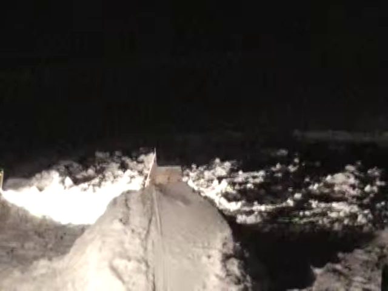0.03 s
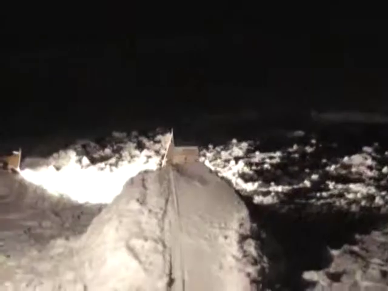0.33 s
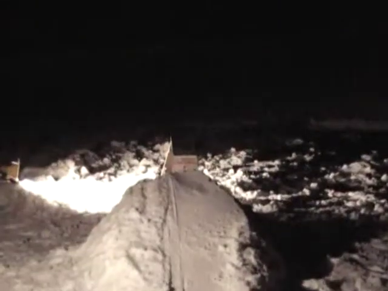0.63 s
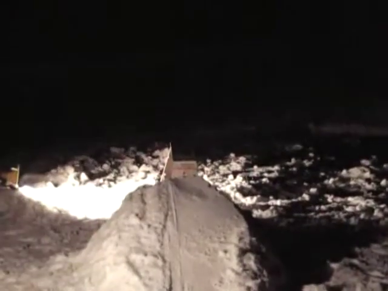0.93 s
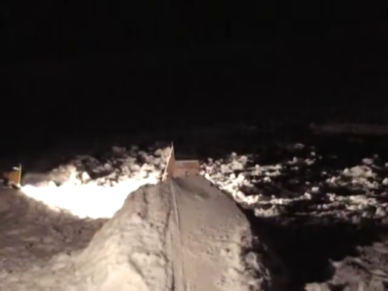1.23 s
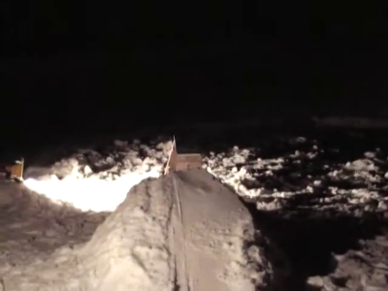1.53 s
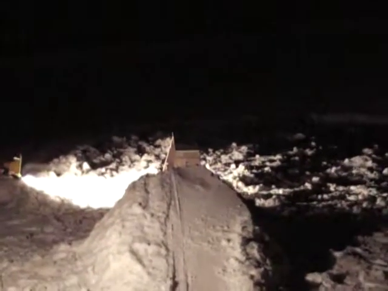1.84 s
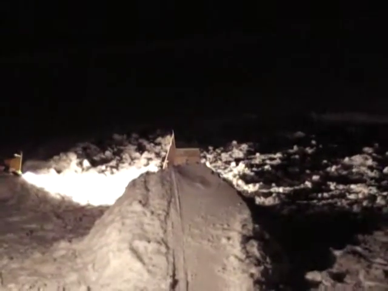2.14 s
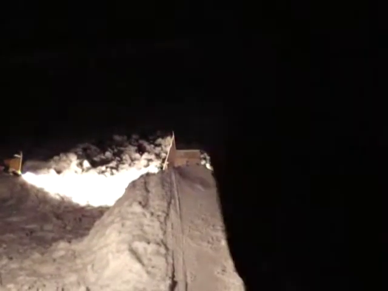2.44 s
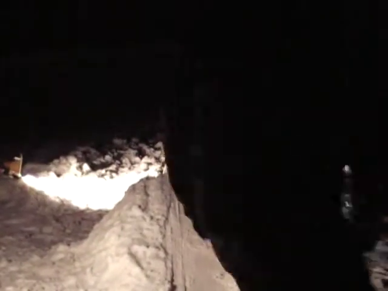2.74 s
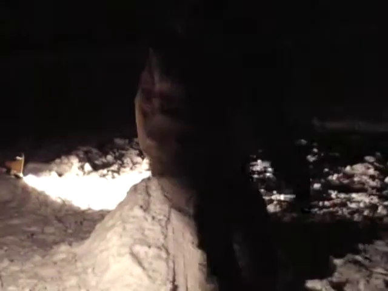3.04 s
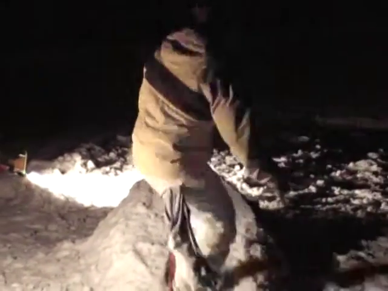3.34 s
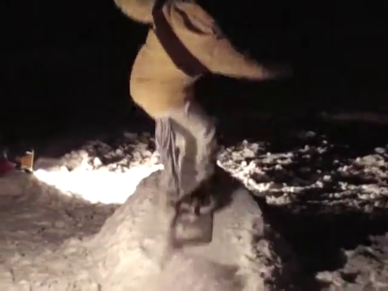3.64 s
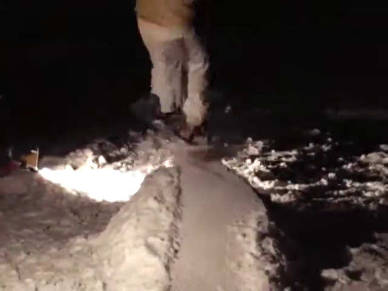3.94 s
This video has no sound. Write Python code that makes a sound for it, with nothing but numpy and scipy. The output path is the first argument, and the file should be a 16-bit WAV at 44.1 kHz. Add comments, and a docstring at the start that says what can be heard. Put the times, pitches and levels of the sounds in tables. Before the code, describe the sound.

A small generator drones steadily outdoors with a fast, clattering beat. A snowboard hisses closer over packed snow, sweeps past the microphone with a spray and a few scrapes, briefly muffling the engine, then fades up a ramp.

```python
"""Outdoors on a snow slope at night, two close microphone ports near a snow ramp. A single-cylinder
generator drones: each turn gives two exhaust puffs, a clack of the housing and a rattle over hiss.
A snowboard hisses down the run-in, passes close by, screening the generator for a moment,
and rides up the ramp. The recorder's gain control ducks under the loudest hiss."""
import sys
import numpy as np
from scipy import signal
from scipy.fft import rfft, irfft
from scipy.io import wavfile
from scipy.ndimage import uniform_filter1d

SR = 44100
rng = np.random.default_rng(int(sys.argv[2]) if len(sys.argv) > 2 else 0)


def wav_record(signal):
    """Record a signal, one row per channel, as 16-bit PCM in the file named by sys.argv[1]."""
    frames = np.transpose(np.atleast_2d(signal))
    bounded = np.clip(frames, -1, 1)
    # unit amplitude maps onto the largest positive 16-bit level
    quanta = np.round(bounded * 32767).astype(np.int16)
    wavfile.write(sys.argv[1], SR, quanta)


N = 176400
TIME, FREQS = np.arange(N) / SR, np.arange(N // 2 + 1) * SR / N


def from_db(db):
    """Decibels to gain."""
    return 10 ** (np.asarray(db) / 20)

def unit_power(x):
    """Scale to unit power."""
    return x / np.sqrt(np.mean(x ** 2) + 1e-20)

def in_time(rows):
    """A control curve at every sample."""
    return np.interp(TIME, *np.transpose(rows))

def over_hz(points):
    """A spectrum table at every frequency."""
    hz, value = np.transpose(points)
    return np.interp(np.log(FREQS + 1), np.log(hz), value)

def colour(x, points):
    """Filter to a spectrum that falls away beyond its ends; unit power."""
    skirts = np.minimum(FREQS / points[0][0], 1) ** 2 * np.minimum(points[-1][0] / (FREQS + 1), 1) ** 2
    return unit_power(irfft(rfft(x) * from_db(over_hz(points)) * skirts, N))

def noise():
    """White noise."""
    return rng.standard_normal(N)

def drift(hz):
    """Random wander of unit power, mostly slower than hz."""
    return unit_power(irfft(rfft(noise()) / (1 + (FREQS / hz) ** 2), N))

def gate(turns, at, width, base):
    """A bell-shaped swell once a turn, over a steady base."""
    return base + np.exp(-.5 * (((turns - at + .5) % 1 - .5) / width) ** 2)

def swell(centre_s, half_length_s, db):
    """One bell-shaped rise and fall."""
    return from_db(db) * np.exp(-.5 * ((TIME - centre_s) / half_length_s) ** 2)


# The generator's steady beat as heard at the microphone, slipping slightly earlier while the rider passes.
# Each row: time in seconds, heard beats per second.
HEARD_BEAT_RATE = [(2.1, 31.135), (2.3, 31.31), (2.5, 31.133)]
TURN_SAMPLES = int(SR / HEARD_BEAT_RATE[0][1])

def heard_turns(clack_s=.1409, wobble_s=.00008):
    """The engine's turns as heard, one a beat, slightly unsteady and whole at each clack."""
    rate = in_time(HEARD_BEAT_RATE)
    turns = np.cumsum(rate) / SR
    return turns - np.interp(clack_s, TIME, turns) + rate * wobble_s * drift(2.8)


# The note at the tailpipe. Each row: multiple of the beat rate, relative level in dB.
EXHAUST_ORDERS = [(1, -24.5), (2, -10), (3, -12), (4, -6), (5, 3), (6, -1.5), (7, -2.5), (8, -2.5),
                  (9, -12.5), (10, -6.5), (11, -7), (12, -13.5), (13, -13), (14, -15), (15, -22),
                  (16, -19.5)]
# The gush of gas. Each row: frequency in Hz, relative level in dB.
GUSH_SPECTRUM = [(30, -19), (90, -12), (150, 1.5), (280, 4.5), (420, -12), (600, 0), (1000, -15)]

def exhaust(turns, screen_db):
    """Low orders line up as two puffs a turn, each with a silencer echo and a gush of turbulence."""
    first_puff, gap, echo_delay = -.228, .358, .151  # turns
    note = 0
    for order, db in EXHAUST_ORDERS:
        pair = 1 - 1j * np.exp(-2j * np.pi * order * gap)
        echo = 1 + .32 * np.exp(-2j * np.pi * order * echo_delay)
        pipe_lag = .39 * (order * np.log(order / 6) - order + 6)  # the lowest orders trail in the pipe
        phase = 2 * np.pi * order * (turns - first_puff) + np.angle(pair * echo) + pipe_lag
        note = note + from_db(db) * np.cos(phase)
    puffs = sum(gate(turns, at, width=.072, base=.71) for at in (first_puff, first_puff + gap))
    gush = colour(noise() * puffs, GUSH_SPECTRUM)
    return from_db(-23.6 + .29 * drift(5.9)) * unit_power(note) + from_db(-34.3 + screen_db) * gush


def strikes(turns, spread_db, jitter_s=.00001):
    """One click a turn, uneven in time and strength."""
    at = np.flatnonzero(np.diff(np.floor(turns)) > 0)
    timing, strength = rng.standard_normal((len(at), 2)).T
    clicks = np.zeros(N)
    clicks[np.clip(at + (jitter_s * SR * timing).astype(int), 0, N - 1)] = from_db(spread_db * strength)
    return clicks

def ring(clicks, hz, t60):
    """A panel resonance with gain 1 at its peak."""
    radius = from_db(-60 / (t60 * SR))
    feedback = [1, -2 * radius * np.cos(2 * np.pi * hz / SR), radius ** 2]
    return signal.lfilter(np.array([1, 0, -1]) * (1 - radius ** 2) / 2, feedback, clicks + 1e-18)

def panel_chirp(clicks, s_per_hz=4.6e-6):
    """In a panel the higher frequencies arrive first, so each click becomes a short falling chirp."""
    phase = np.pi * s_per_hz * (np.minimum(FREQS, 2000) - 1300) ** 2
    return irfft(rfft(clicks) * np.exp(1j * phase), N)

# The clack of the housing. Each row: frequency in Hz, relative level in dB.
CLACK_SPECTRUM = [(900, -45), (1010, -22), (1090, -6), (1190, 0), (1430, 0), (1500, -5), (1570, -15),
                  (1800, -19), (1950, -45)]
# Its ringing panels. Each row: frequency in Hz, relative gain in dB, seconds to fall 60 dB.
PANEL_MODES = [(1187.6, 8, 0.52), (1432, 6.5, 0.3)]

def housing(turns):
    """A hard clack each turn sets the panels ringing and echoes between the strokes."""
    clicks = strikes(turns, spread_db=.4)
    clacks = colour(panel_chirp(clicks), CLACK_SPECTRUM)
    ringing = unit_power(sum(from_db(db) * ring(clicks, hz, t60) for hz, db, t60 in PANEL_MODES))
    echo_paths = irfft(1j * np.sign(rfft(rng.standard_normal(TURN_SAMPLES)).imag))  # flat spectrum
    between_strokes = 1 - gate(turns, at=0, width=.07, base=0)
    echoes = colour(signal.fftconvolve(clicks, echo_paths)[:N] * between_strokes, CLACK_SPECTRUM)
    return from_db(-23.6) * clacks + from_db(-29.5) * echoes + from_db(-31.7) * ringing


# The casing's clatter. Each row: frequency in Hz, relative level in dB.
CLATTER_SPECTRUM = [(950, -42), (1130, -7), (1220, -4), (1450, 0.5), (1700, -1.5), (1870, -6), (2000, -25),
                    (2400, -54)]
# Its drone. Each row: multiple of the beat rate, level in dB before screening.
DRONE_ORDERS = [(20, -40.5), (22, -43), (27, -49), (29, -44.5)]

def casing(turns):
    """The casing clatters steadily, and the engine's higher orders drone through it."""
    clatter = from_db(-25) * colour(noise(), CLATTER_SPECTRUM)
    drone = sum(from_db(db + 2 * drift(8)) * np.cos(2 * np.pi * (order * turns + rng.random()))
                for order, db in DRONE_ORDERS)
    return clatter + np.sqrt(2) * drone


# The engine's treble at the microphone. Each row: frequency in Hz, relative level in dB.
HISS_SPECTRUM = [(1500, -50), (2020, -8), (2130, -1), (2350, 4), (2800, 0), (3800, 2), (4400, -2),
                 (5100, 4.5), (5600, -4), (6050, -0.5), (6600, -8.5), (7200, -5.5), (8000, -11),
                 (8900, -12), (9700, -17), (10400, -25.5), (12400, -26), (15500, -41)]

def engine_hiss(turns):
    """Air noise swells each turn; the moving parts repeat one fine rattle."""
    airflow = gate(turns, at=-.15, width=.25, base=2.3) * from_db(1.07 * drift(230) + .37 * drift(17))
    pattern = rng.standard_normal(TURN_SAMPLES)
    rattle = signal.fftconvolve(strikes(turns, spread_db=2), pattern)[:N]
    air = colour(noise() * airflow, HISS_SPECTRUM)
    return from_db(-20.9) * air + from_db(-30.5) * colour(rattle, HISS_SPECTRUM)


# The generator from all around the slope. Each row: frequency in Hz, relative level in dB.
WASH_SPECTRUM = [(30, -16), (150, -5), (400, 3.5), (800, 1), (1100, 4), (2000, -15.5)]

def wash():
    """Engine sound spreads over the snow as a steady, diffuse noise."""
    return from_db(-31.3) * colour(noise(), WASH_SPECTRUM)


def crunch(grain_db, flutter_db):
    """Countless snow crystals breaking in uneven clumps."""
    return noise() * from_db(grain_db * drift(500) + flutter_db * drift(20))

# The board, down the run-in, past the microphone, up the ramp. Each row: time in seconds, level in dB.
SLIDE_LEVEL = [(0, -38), (1.12, -35), (1.3, -21), (1.6, -25.5), (1.95, -26), (2.07, -15.5), (2.15, -12.2),
               (2.3, -15), (2.44, -14.6), (2.51, -20), (2.58, -18), (2.64, -13), (2.73, -11.9), (2.81, -18),
               (2.98, -16.5), (3.2, -26), (3.5, -19.4), (3.76, -21.2), (4, -30.5)]
# Its hiss. Each row: frequency in Hz, relative level in dB.
SLIDE_SPECTRUM = [(1000, -18), (2600, -8), (4600, -1.5), (5400, 2), (6100, 1.5), (6900, -2.5),
                  (8000, -11.5), (9200, -15), (10300, -21.5), (15500, -48)]

def slide():
    """The base hisses over packed snow."""
    return from_db(in_time(SLIDE_LEVEL)) * colour(crunch(grain_db=-1, flutter_db=1.54), SLIDE_SPECTRUM)


# Flying snow, loudest close to the microphone. Each row: time in seconds, level in dB.
SPRAY_LEVEL = [(1.1, -55), (1.4, -40), (1.9, -49), (2.07, -28), (2.25, -21), (2.36, -28), (2.54, -30),
               (2.64, -25), (2.75, -38), (3.2, -46), (3.55, -33), (4, -60)]
# Its sizzle. Each row: frequency in Hz, relative level in dB.
SPRAY_SPECTRUM = [(3000, -41), (7000, 4), (9000, 3.5), (10500, -4.5), (12500, -10.5), (14500, -17),
                  (15800, -23)]

def spray():
    """The edge throws up a bright spray of fine snow."""
    return from_db(in_time(SPRAY_LEVEL)) * colour(crunch(grain_db=-.5, flutter_db=1.5), SPRAY_SPECTRUM)


# The board's edge, heard up close. Each row: time in seconds, centre pitch in Hz.
EDGE_GLIDE = [(2.05, 5800), (2.25, 6150), (2.46, 5550), (2.63, 6350), (2.8, 5850)]

def edge(width_hz=600, growth=1.55):
    """The edge sings in a narrow, gliding hiss that swells more steeply than the slide."""
    phase = 2 * np.pi * np.cumsum(in_time(EDGE_GLIDE)) / SR
    band = drift(width_hz) * np.cos(phase) + drift(width_hz) * np.sin(phase)
    return from_db(3.5 + growth * in_time(SLIDE_LEVEL)) * band


# Scuffs near the microphone. Each row: centre in seconds, half length in seconds, peak level in dB.
BASE_SCUFFS = [(2.083, 0.028, -22), (2.594, 0.034, -21), (2.953, 0.094, -19)]
# Their rasp. Each row: frequency in Hz, relative level in dB.
SCUFF_SPECTRUM = [(1800, -3.5), (2900, -0.5), (4000, 3), (5200, -10)]

def scuffs():
    """The flat base scuffs the snow with a lower, grainy rasp."""
    rasp = colour(crunch(grain_db=1.5, flutter_db=1.5), SCUFF_SPECTRUM)
    return sum(swell(*row) for row in BASE_SCUFFS) * rasp


# The board at its nearest. One row: centre in seconds, half length in seconds, peak level in dB.
CLOSEST_PASS = (2.42, .115, -27.5)
# Its rumble. Each row: frequency in Hz, relative level in dB.
RUMBLE_SPECTRUM = [(200, 2.5), (320, 5), (700, 1), (1200, -9)]

def rumble():
    """The board rumbles over the packed snow as it passes closest."""
    return swell(*CLOSEST_PASS) * colour(noise(), RUMBLE_SPECTRUM)


# Stereo width at the microphone. Each row: frequency in Hz, side minus mid in dB.
PORT_WIDTH = [(30, -30), (150, -28.5), (1500, -52.5), (4000, -53), (5500, -17.5), (7000, -16.5),
              (8000, 0.5), (9100, 5.5), (10500, -1), (12500, -2), (15000, -2)]
# Its lean, as far as the width allows. Each row: frequency in Hz, left minus right in dB.
PORT_LEAN = [(30, 6.5), (1000, -6), (4500, 0.5), (6000, -1.5), (7200, -21), (9000, 11), (11000, 3),
             (15000, 1.5)]

def ports(mid, scatter_s=.11):
    """Two close ports hear the bass alike and the treble out of step and partly scattered."""
    width, lean = from_db(over_hz(PORT_WIDTH)), from_db(over_hz(PORT_LEAN)) ** 2
    diffuse_share = np.clip(.23 * FREQS / 8000, 0, .9)
    direct_gain = np.sqrt(1 - diffuse_share)
    balance = (lean - 1) / (lean + 1)
    in_phase = np.clip(balance * (1 + width ** 2) / (2 * width * direct_gain), -1, 1)
    direct = direct_gain * np.exp(1j * np.arccos(in_phase))
    scatter = rfft(noise() * np.exp(-TIME / scatter_s))
    diffuse = np.sqrt(diffuse_share) * scatter / np.std(scatter)
    side = irfft(rfft(mid) * width * (direct + diffuse), N)
    return np.array([mid + side, mid - side])


# The rider passing between generator and microphone. Each row: time in seconds, midrange gain in dB.
RIDER_SCREEN = [(2.07, 0.8), (2.16, -4.5), (2.23, -1), (2.31, -9), (2.45, -6), (2.58, -4), (2.72, -2.5),
                (2.85, 0)]

def scene():
    """The generator and the passing board; the rider briefly screens all but the exhaust note."""
    turns, screen_db = heard_turns(), in_time(RIDER_SCREEN)
    midrange = from_db(screen_db) * (housing(turns) + casing(turns) + wash())
    generator = midrange + exhaust(turns, screen_db) + from_db(.89 * screen_db) * engine_hiss(turns)
    board = slide() + edge() + spray() + rumble() + scuffs()
    return ports(generator + board)

def record(dry, threshold_db=-14, squeeze=.65, release_db_per_s=55, start_s=.0815, cutoff_hz=15700):
    """Gain control ducks loud passages; the sound starts abruptly, peaks clip and the top is cut."""
    power = uniform_filter1d(np.mean(dry ** 2, axis=0), size=1416)  # 32 ms
    over_db = np.maximum(10 * np.log10(power + 1e-12) - threshold_db, 0)
    release_db = release_db_per_s * TIME
    held_db = np.maximum.accumulate(over_db + release_db) - release_db
    opening = np.clip((TIME - start_s) / .006, .02, 1) ** 2
    ducked = dry * from_db(-squeeze * held_db) * opening
    lowpass = signal.ellip(10, .05, 60, cutoff_hz, fs=SR, output="sos")
    return signal.sosfilt(lowpass, np.clip(ducked, -.92, .92))


dry = scene()
out = record(dry)
wav_record(out)
```